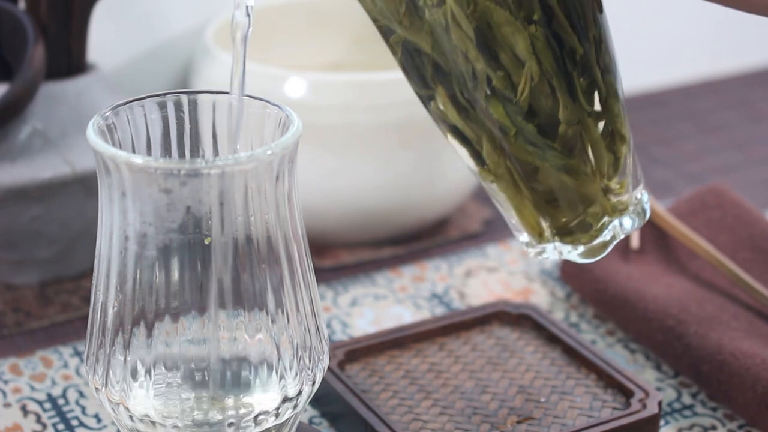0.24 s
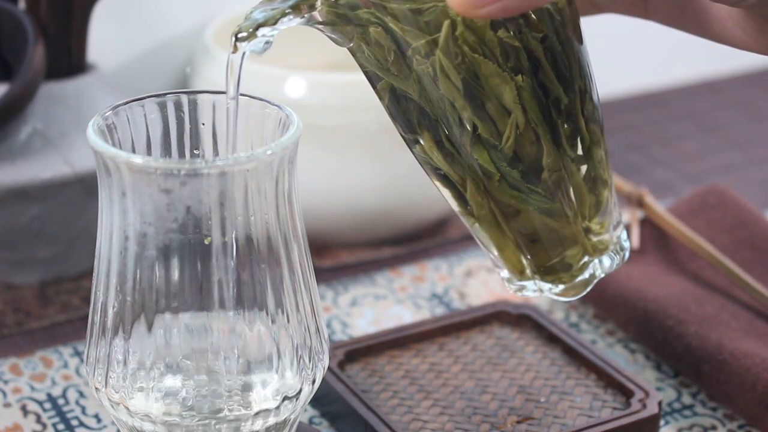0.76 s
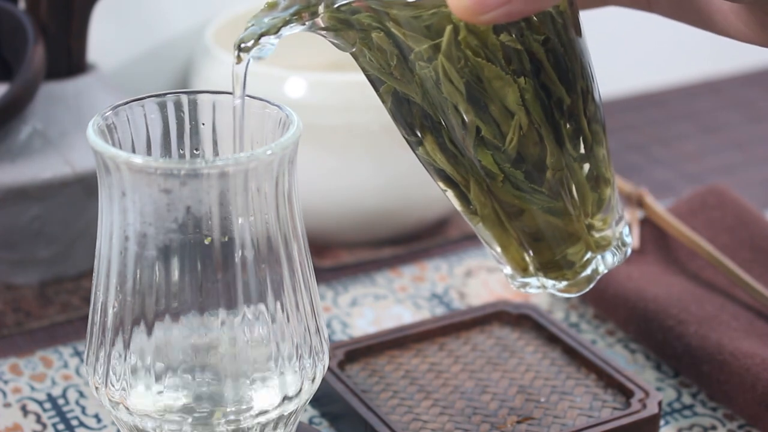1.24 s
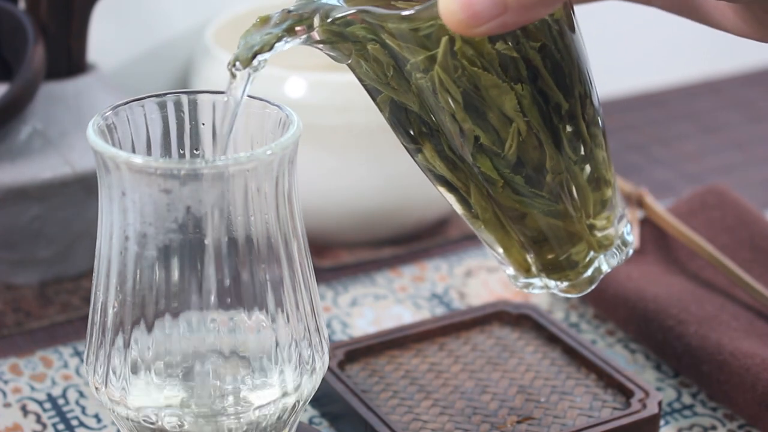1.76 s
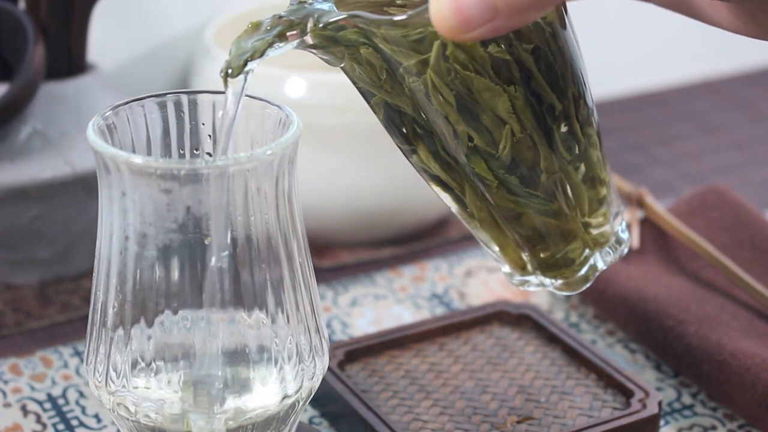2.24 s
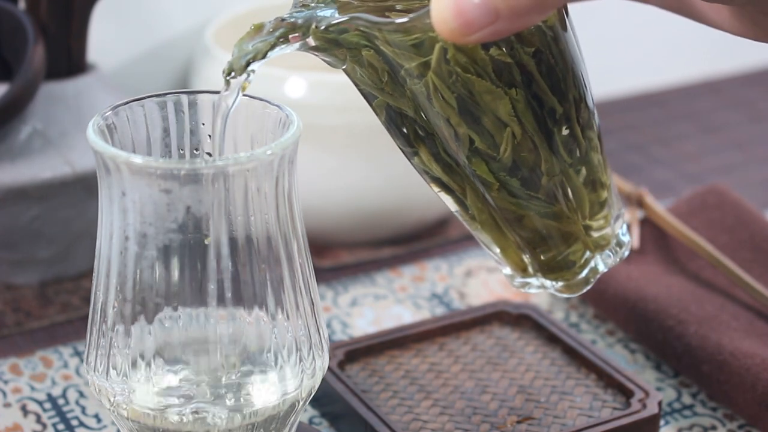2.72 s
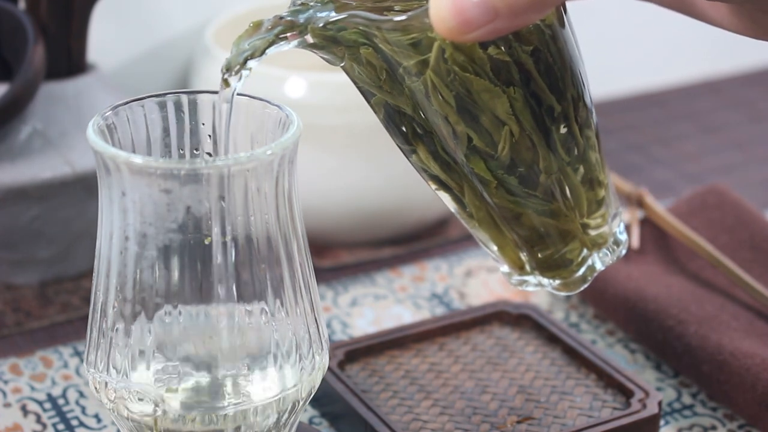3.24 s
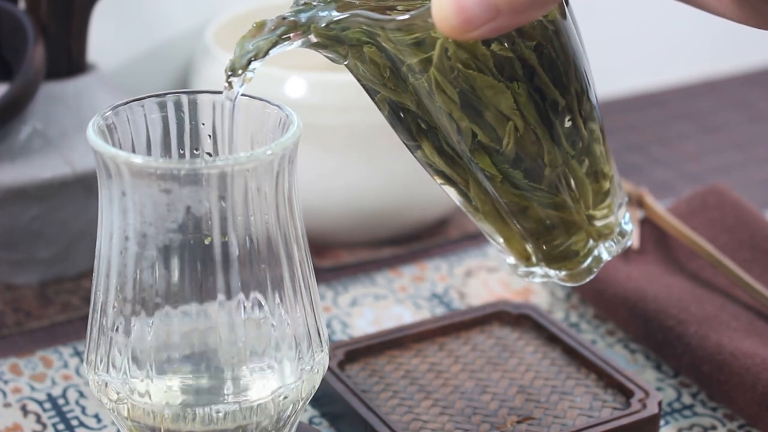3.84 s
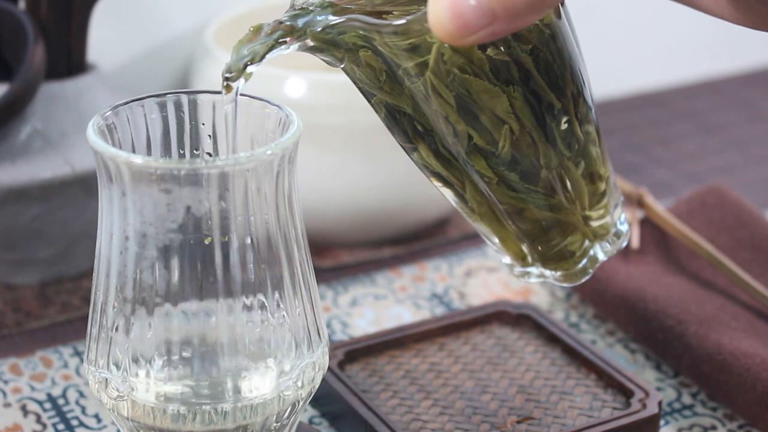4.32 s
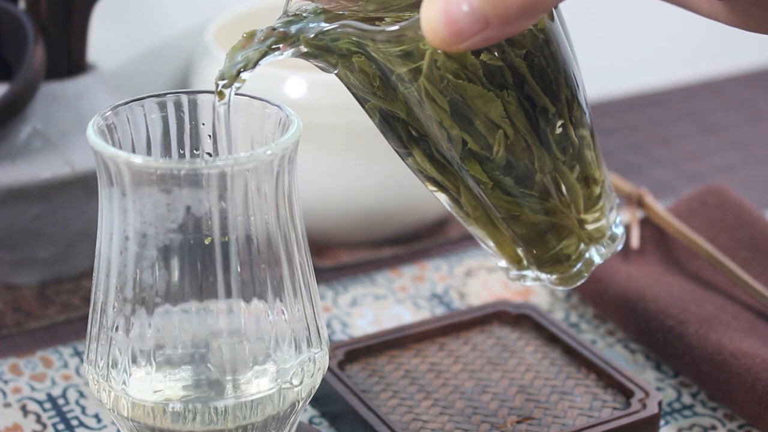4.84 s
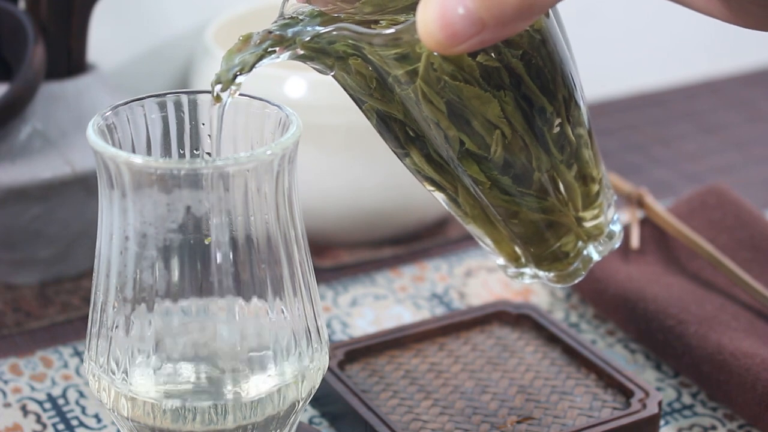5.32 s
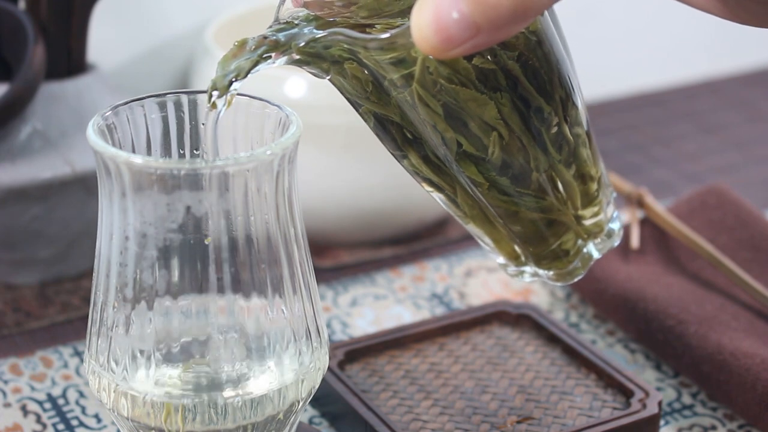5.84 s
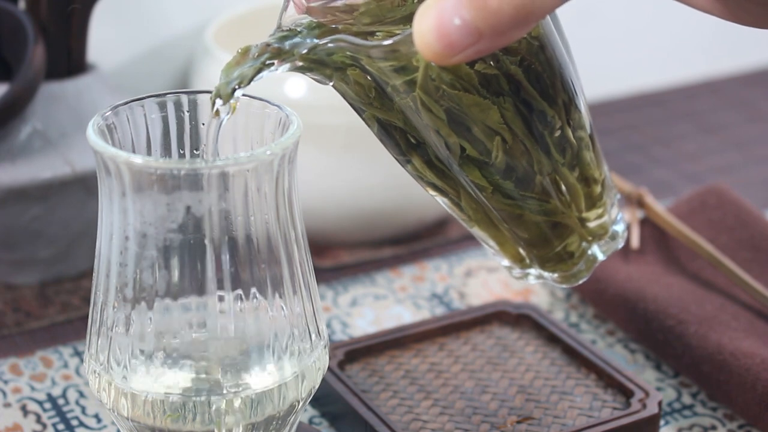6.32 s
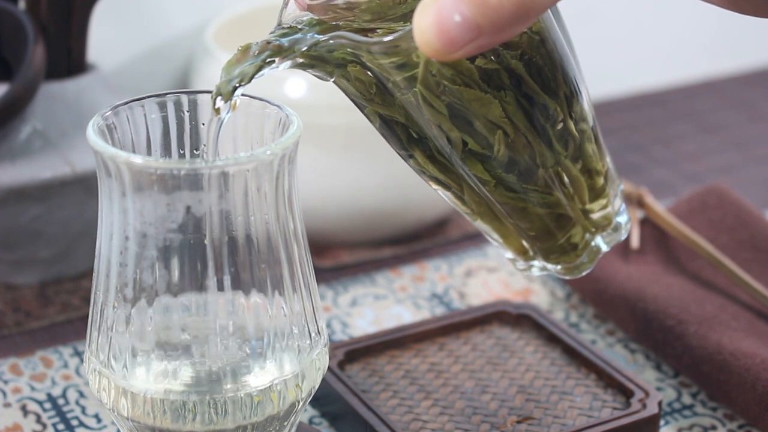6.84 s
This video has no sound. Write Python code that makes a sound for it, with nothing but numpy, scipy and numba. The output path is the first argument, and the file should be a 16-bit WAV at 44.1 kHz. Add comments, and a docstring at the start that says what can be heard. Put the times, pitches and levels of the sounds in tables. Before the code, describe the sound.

In a quiet small room, a low wavering hum and dull rumble lie very faintly underneath. At about 0.07 s a thin stream of tea lands in a tall glass, close to the microphone and slightly left. Through the first 0.7 s, rounded, hollow plinks around 800 Hz crowd together with crisp wet ticks and tiny bright bubbles. From 0.9 to 3 s the plops become shorter and snappier, with strong ones near 1.4, 1.9 and 2.6 s, brief gurgles, and thin high glassy rings at about 1.95, 2.15 and 2.55 s. Soft low table bumps fall near 1.9, 2.5 and 4.5 s. From 3 to 7 s the pour is lighter and sparser, plinks mostly above 1000 Hz, accents near 4.2, 5.3 and 5.8 s. The hollow glass resonance climbs unevenly, while the topmost sparkle softens. Reflections are short, and the pouring continues to the end.

```python
"""In a small room, a thin stream of tea runs from a pitcher into a tall glass close to a stereo microphone.
Drops tick as short noise bursts; trapped air bubbles plink as dying sines, over a random trickle and spray.
Resonant filters for the air above the tea colour them all; their lowest pitch climbs unevenly as it fills.
Three thin glassy tones ring, soft low pings bump the table or thump under a big plink, and a wavering hum lies
over dull rumble."""
import sys
import numpy as np
from scipy import signal
from scipy.fft import rfft, irfft, next_fast_len
from scipy.io import wavfile
from numba import njit

SR = 44100
rng = np.random.default_rng(int(sys.argv[2]) if len(sys.argv) > 2 else 0)


def int16_out(signal):
    """Quantize to a 16-bit WAV file."""
    q = np.round(np.clip(np.atleast_2d(signal).T, -1, 1) * 32767)
    wavfile.write(sys.argv[1], SR, q.astype(np.int16))


N = 311787  # length in samples
TIME = np.arange(N) / SR  # seconds
TOP_HZ = 16400  # highest pitch kept

# loudest plinks, large air bubbles trapped by the stream, before the glass colours them:
# [t/s, level/dB, f/Hz, 60 dB decay time before stretching/s]
BUBBLES = [(0.068, -4.5, 1140, 0.015), (0.0756, -10.5, 879, 0.084), (.1137, -19.5, 883, 0.13),
           (.152, -16.5, 1820, 0.021), (0.1693, -9.5, 891, 0.092), (.182, -10, 857, 0.17),
           (.196, -2.5, 774, 0.072), (.213, -5.5, 722.4, 0.073), (.2417, -4, 801, 0.047),
           (0.279, -16.5, 1750, 0.033), (.2813, -7.5, 765, 0.052), (.3356, -14.5, 810, .035),
           (0.3825, -19.5, 775, 0.11), (.4097, -11, 794, 0.096), (.458, 2.5, 794, 0.05),
           (.4849, -12.5, 880, 0.1), (0.5066, -13, 850, 0.097), (.5467, -2.5, 780, .042),
           (0.5779, -17, 890, 0.055), (.6198, -10.5, 1664, 0.018), (.62, -7, 876, .05),
           (.6553, -3.5, 904, 0.031), (.6912, -6, 940, 0.028), (0.824, -22, 808, .08),
           (0.8603, -8.5, 842, 0.1), (0.9338, -17, 1670, 0.016), (0.9375, -1, 2260, 0.0049),
           (0.9655, -15, 1760, 0.019), (1.0527, 0.5, 1080, 0.017), (1.069, -2.5, 1860, 0.0089),
           (1.0714, 0.5, 970, 0.0059), (1.1585, -11, 842, 0.096), (1.2439, -10, 1130, 0.0071),
           (1.2964, -21, 946, 0.037), (1.3302, -19.5, 970, 0.034), (1.4006, 4.5, 1033, 0.0081),
           (1.4406, -20, 900, 0.023), (1.4848, -17.5, 2200, 0.015), (1.5026, -15, 950, 0.03),
           (1.5428, -11.5, 2000, 0.0089), (1.557, -30, 1620, 0.022), (1.62, 2, 1620, 0.0037),
           (1.6351, -6.5, 940, 0.036), (1.666, -15, 903, 0.073), (1.7026, -6, 1216, .013),
           (1.7668, -16.5, 900, 0.093), (1.7966, -25.5, 854, 0.16), (1.8234, -10.5, 896, 0.075),
           (1.885, 7, 1245, 0.0052), (1.94, -11, 803, 0.041), (2.0024, -1.5, 930, 0.018),
           (2.0283, -17.5, 947, 0.078), (2.091, 3, 1067, 0.012), (2.14, -18, 1060, 0.02),
           (2.2493, 0, 1830, 0.0065), (2.3381, -15.5, 1586, 0.034), (2.3707, -7, 1480, 0.0053),
           (2.5238, -1, 1580, 0.0063), (2.5328, -7.5, 1175, 0.012), (2.5871, -12.5, 1180, 0.03),
           (2.623, 10, 1410, 0.004), (2.6492, -3.5, 880, 0.036), (2.6813, -16.5, 929, 0.068),
           (2.7351, 0.5, 1060, 0.014), (2.7629, -22, 964, 0.052), (2.8529, -14, 1284, 0.017),
           (2.8918, -21.5, 990, 0.052), (2.9292, -12.5, 1840, 0.01), (2.9344, -7.5, 1057, 0.02),
           (3.005, -0.5, 1360, 0.0037), (3.054, -11, 1154, 0.019), (3.0886, -20.5, 1040, 0.022),
           (3.1406, -14, 962, 0.08), (3.2918, -23, 1810, 0.031), (3.3455, -27.5, 1077, 0.025),
           (3.401, -5, 1780, 0.0067), (3.42, -16.5, 1280, 0.015), (3.547, -21, 2261, 0.011),
           (3.5974, -13.5, 1280, 0.011), (3.6569, -11, 1012, 0.034), (3.731, -17, 1194, 0.019),
           (3.8808, -7, 977, 0.044), (3.922, -11, 962, 0.061), (4.0449, -17.5, 1850, .02),
           (4.0577, -19.5, 1252, 0.092), (4.0874, -13, 1205, 0.018), (4.1174, -15, 1140, 0.011),
           (4.1662, -20, 1420, 0.018), (4.2331, 2, 1630, 0.0048), (4.3122, -10.5, 1007, 0.11),
           (4.3958, -3, 1120, 0.032), (4.6052, -10, 1035, 0.11), (4.6439, -21, 1006, 0.044),
           (4.7416, -16, 1130, 0.045), (4.8105, -30, 2030, .022), (4.8375, -10.5, 1744, 0.017),
           (4.8717, -10.5, 1600, 0.0073), (4.9112, -15, 1500, 0.0067), (4.969, -33, 1220, .07),
           (5.0187, -3.5, 1370, 0.0074), (5.0493, -16.5, 1266, 0.023), (5.093, -21, 1340, .015),
           (5.1128, -12, 1440, 0.007), (5.1882, -13.5, 2006, 0.016), (5.288, -19.5, 1137, 0.083),
           (5.3343, 0, 1206, 0.016), (5.4898, -2.5, 1340, 0.0097), (5.6969, -12, 2050, 0.016),
           (5.752, -13.5, 2180, 0.013), (5.7999, 0.5, 1250, 0.0078), (5.874, -7, 1130, 0.037),
           (6.0261, -10.5, 1322, 0.012), (6.1013, -21, 1760, 0.013), (6.1261, -12, 1680, 0.022),
           (6.2012, -23.5, 1166, 0.044), (6.2363, -9.5, 1540, 0.0049), (6.3525, -20, 1780, 0.017),
           (6.4737, -14.5, 1030, 0.03), (6.5051, -6, 1077, 0.028), (6.517, -13, 1030, 0.052),
           (6.7077, -12, 2010, 0.019), (6.8046, -13, 1650, 0.013), (6.8663, -17.5, 1209, 0.059),
           (6.9054, -11.5, 1123, 0.061), (7.0267, -14, 1570, 0.0055)]
# broad colour of a sound as it leaves the mouth of the glass: [f/Hz, level/dB]
MOUTH = [(300, -21.5), (950, 20), (1800, 18.5), (2650, 9.5), (3450, 23.5), (4100, 15.5), (5000, 4.5),
         (5850, 22), (7100, 15.5), (8700, 11.5), (9800, -6), (10800, 2), (13000, -1.5), (16000, -22.5)]


def amp(db):
    """Turn decibels into a gain."""
    return 10 ** (np.asarray(db) / 20)


def unit(x):
    """Scale a sound to an rms (average strength) of 1."""
    return x / np.sqrt(np.mean(x ** 2))


def add(out, s, sound):
    """Mix a sound into a track at time s, in seconds."""
    i = int(np.clip(s * SR, 0, N - 1))
    out[i:i + len(sound)] += sound[:N - i]


def fade(t, t60):
    """Die away exponentially, by 60 dB in t60 seconds."""
    return np.exp(-np.log(1000) * t / t60)


def gain_at(hz, points):
    """Read the gain of a (Hz, dB) curve at the given frequencies, on a logarithmic pitch scale."""
    f, db = np.transpose(points)
    return amp(np.interp(np.log(np.maximum(hz, 1)), np.log(f), db))


def colour(x, points, size=1024):
    """Filter by a (Hz, dB) curve, with an echo-free response that starts at once (minimum phase)."""
    cepstrum = irfft(np.log(gain_at(np.fft.rfftfreq(size, 1 / SR), points)))
    # fold the second half onto the first, so that nothing sounds ahead of its cause
    cepstrum[1:size // 2] *= 2
    cepstrum[size // 2 + 1:] = 0
    response = irfft(np.exp(rfft(cepstrum)))
    return signal.fftconvolve(x, response)[:len(x)]


def cut(x, hz, kind, order=2):
    """Keep only the sound above ("high") or below ("low") a frequency."""
    return signal.sosfilt(signal.butter(order, hz, kind, fs=SR, output="sos"), x)


@njit
def resonate(x, hz, width):
    """Band-pass (gain 1 at the centre) and high-pass outputs of a resonance with a moving centre."""
    y = np.empty((2, len(x)))
    band, low = 0., 0.  # the filter's two memories
    for i in range(len(x)):
        g = np.tan(np.pi * hz[i] / SR)
        k = width / hz[i]
        v = (band + g * (x[i] + 1e-18 - low)) / (1 + g * (g + k))
        y[0, i] = k * v
        y[1, i] = x[i] - k * v - low - g * v
        band, low = 2 * v - band, low + 2 * g * v
    return y


def ping(db, hz, t60, rise=0, attack=.0001):
    """A dying sine whose pitch climbs by the share `rise` each second, as a bubble's does near the surface."""
    t = np.arange(int(t60 * SR) + 2) / SR
    phase = 2 * np.pi * hz * (t + rise * t * t / 2)
    return amp(db) * (1 - np.exp(-t / attack)) * fade(t, t60) * np.sin(phase)


def background(rumble_db=-65, waver=0.74, waver_hz=6, apart_db=-7):
    """A low hum of steady pitches wavers in level, over a dull rumble that differs between the sides."""
    # hum before wavering: [f/Hz, rms level/dB]
    hum_tones = [(55, -70), (317.6, -87.5), (436, -81)]
    # room rumble, whose overall level is set apart: [f/Hz, relative level/dB]
    rumble_colour = [(20, -31), (40, -22), (58, -9), (80, -26.5), (115, -41), (200, -43), (420, -38.5),
                     (1000, -47), (7000, -62), (14000, -84.5)]
    noise = rng.standard_normal((3, N))
    spectra = rfft(noise[:2]) * gain_at(np.fft.rfftfreq(N, 1 / SR), rumble_colour)
    mid, side = (unit(v) for v in irfft(spectra, N))
    hum = sum(amp(db) * unit(np.sin(2 * np.pi * hz * TIME)) for hz, db in hum_tones)
    hum = hum * (1 + waver * unit(cut(noise[2], waver_hz, "low")))
    return hum + amp(rumble_db) * (mid + amp(apart_db) * side * np.array([[1], [-1]]))


def column_hz(s):
    """Lowest resonance of the air in the glass at time s: a shorter air column sounds higher."""
    # lowest resonance of the air above the tea: [t/s, f/Hz]
    column = [(0, 799), (.45, 876), (.7, 906.5), (1.4, 1016), (2.7, 925), (3.2, 1062), (4.4, 953),
              (6.2, 1043), (7.07, 1058)]
    return np.interp(s, *np.transpose(column))


def all_drops(tick_db=-25, plink_tilt_db=-1, bead_db=-27, bead_hz=3480,
              faint_db=-36, range_db=10, faint_tilt_db=16, faint_bead_db=-25,
              low_hz=3200, high_hz=10000, count=90):
    """List the loud drops, a dull one that starts each plink, and faint ones at random times."""
    # loudest drops, each leaving a tiny bubble, before later gains; brightness tilt is the
    # boost at 11 kHz and equal cut at 3 kHz:
    # [t/s, tick level/dB, brightness tilt/dB, bubble level/dB, bubble f/Hz]
    loud = [(.0678, -21.5, 5, -5.5, 6450), (.145, -36, -20, -18.5, 3100), (.1546, -25, -1, -12.5, 5660),
            (.171, -20, 5, -16.5, 11300), (.1956, -9.5, -2.5, -27, 3530), (.2357, -15.5, 2, -13, 8400),
            (.28, -17, 4.5, -14, 14100), (0.326, -32, 6, -27, 11500), (0.3686, -53, -5, -32, 3320),
            (.4076, -25.5, -14, -17, 10900), (.451, -5, -4, -45, 3320), (.483, -23, 6, -36.5, 3445),
            (.507, -22.5, -7, -15.5, 5900), (.5498, -50, -3, -12, 3960), (.6917, -15, 5, -40, 3740),
            (.7283, -23, 6, -12.5, 12100), (.8608, -11.5, 3, -14.5, 4170), (.8865, -14.5, 4.5, -21.5, 3280),
            (.9406, -44, 12, -14.5, 3000), (.9661, -36, -21, -7, 3240), (1.0194, -12.5, 10, -7, 8000),
            (1.0532, -14, 1.5, -26, 3340), (1.0703, -19, 6, -20, 3200), (1.2538, -29.5, 10, -37, 3340),
            (1.379, -31.5, -15.5, -44, 3200), (1.548, -27.5, 10, -29, 4350), (1.5587, -18, -7, -10.5, 3560),
            (1.5967, -43, -26, -9.5, 3240), (1.6207, -26.5, -18.5, -28, 3650),
            (1.7057, -26.5, -14, -22, 4080), (1.821, -23.5, 4, -21, 14800), (1.8834, -11, 8.5, -41, 9030),
            (1.896, -48, 4, -12.5, 3280), (1.9476, -24.5, -1.5, -22.5, 4130),
            (2.0097, -19, -3, -15.5, 3900), (2.0423, -6.5, -2, -12.5, 2840), (2.0675, -13, 0, -28, 6100),
            (2.1713, -34, 26.5, -23, 4620), (2.197, -15.5, 0.5, -25, 4430), (2.2398, -19.5, 10, -9.5, 6170),
            (2.2665, -18, -1, -31, 3500), (2.2861, -29, 12, -19, 15000), (2.3374, -14.5, -1.5, -17, 14200),
            (2.4049, -23.5, 23, -11, 10000), (2.433, -36, 35, -9.5, 11200), (2.559, -15, -4.5, -47, 3630),
            (2.6235, -19.5, 2.5, -38, 3445), (2.8768, -28, 23.5, -11, 6230), (2.9307, -25, 15, -18, 3500),
            (2.956, -36, 27, -24, 8950), (3.005, -25.5, -3, -32, 3300), (3.0324, -24, 18, -50, 8300),
            (3.1099, -45, 31, -19, 10600), (3.1289, -27.5, 18, -16.5, 8300),
            (3.2049, -18.5, 4.5, -27, 9250), (3.2486, -19.5, 4.5, -27, 3480),
            (3.4044, -29, -15.5, -19, 3520), (3.423, -19, -7, -18, 3260), (3.5051, -26, 15, -34, 8840),
            (3.549, -20, -4.5, -14.5, 5940), (3.791, -16, 2.5, -14, 4150), (3.8493, -30, 11.5, -11, 5900),
            (3.987, -26.5, -0.5, -31, 3600), (4.0456, -26, 13, -30, 8440), (4.0884, -21, -1.5, -17.5, 3470),
            (4.1175, -18, 3.5, -18.5, 4650), (4.1667, -21.5, 0, -16.5, 3460), (4.247, -20, -0.5, -26, 3420),
            (4.3699, -58, -3, -23.5, 3580), (4.3926, -27, -4, -25, 3630), (4.456, -41, -12, -25.5, 3450),
            (4.555, -21, 22, -18.5, 3440), (4.6117, -19.5, 2, -13.5, 3790), (4.7137, -38, 7, -24, 3500),
            (4.8353, -26, -10.5, -37, 3800), (4.9004, -49, 36.5, -38, 3450), (5.1187, -39, 29.5, -18, 8630),
            (5.151, -19.5, 4, -14.5, 3370), (5.19, -22, 3, -23.5, 10700), (5.2198, -37, 22, -28, 4040),
            (5.2642, -18.5, 18, -1.5, 7000), (5.3346, -9, 1, -14, 3630), (5.489, -40.5, 24, -31, 3490),
            (5.5538, -23, -1, -11.5, 3770), (5.563, -16, 10.5, -14, 5170), (5.6192, -15, 0, -14, 4100),
            (5.696, -21.5, -4, -20.5, 3430), (5.7352, -20, 7, -20, 3660), (5.7506, -24, 13, -21, 3400),
            (5.772, -38, 21, -33, 9900), (5.9529, -40.5, 33, -21, 14500), (5.9637, -19, 3.5, -13, 3550),
            (6.1244, -10, 1, -8, 3530), (6.1836, -31.5, -7.5, -14, 8580), (6.23, -24.5, -1, -27, 8530),
            (6.2967, -45, 43, -15, 11050), (6.3712, -35, 22, -15.5, 8800), (6.399, -33, -4, -33, 10800),
            (6.5047, -28, 18, -24.5, 4230), (6.6045, -28, 8, -13.5, 6070), (6.628, -40, 10, -20, 3250),
            (6.708, -53, -16, -11.5, 3116), (6.791, -26.5, -4.5, -38, 3650), (6.818, -25, -6.5, -34, 3400),
            (6.94, -16.5, -6, -14.5, 3770)]
    plinks = [(s, tick_db + db, plink_tilt_db, bead_db + db, bead_hz) for s, db, _, _ in BUBBLES]
    start = BUBBLES[0][0]
    faint = []
    for k, (when, luck, small) in enumerate(rng.random((count, 3))):
        s = start + (k + when) / count * (N / SR - start)  # one in each equal slice of time
        quieter_db = range_db * luck
        hz = low_hz * (high_hz / low_hz) ** (small * small)
        faint.append((s, faint_db - quieter_db, faint_tilt_db * small, faint_bead_db - quieter_db, hz))
    return list(loud) + plinks + faint


def drops(falls, crack_db=-15, crack_t60=0.0035, splatter_db=-22, splatter_t60=0.0082, attack=0.00024,
          top_tilt=1.14, air_db=5, dulling_db_per_s=6.0, size=1400):
    """Each drop is a noise crack and splatter, dull or bright; as the fall shortens, the very top fades."""
    out, t = np.zeros(N), np.arange(size) / SR
    shape = amp(crack_db) * fade(t, crack_t60) + amp(splatter_db) * fade(t, splatter_t60)
    shape = shape * (1 - np.exp(-t / attack))
    for (s, db, tilt, _, _), grit in zip(falls, rng.standard_normal((len(falls), size))):
        top_db = top_tilt * tilt + air_db - dulling_db_per_s * s
        slope = [(3000, -tilt), (11000, tilt), (13500, top_db)]
        add(out, s, amp(db) * colour(grit * shape, slope, size=128))
    return colour(out, MOUTH)


def beads(falls, level_db=-1, cycles=40, rise=14, small_db=-13, small_cycles=22, scatter=0.13,
          late_s=0.017, count=4):
    """Each drop leaves one tiny ringing bubble, then a few fainter ones of about its size."""
    out = np.zeros(N)
    for (s, _, _, db, hz), chances in zip(falls, rng.random((len(falls), count, 3))):
        add(out, s, ping(db + level_db, hz, cycles / hz, rise, attack=0.00047))
        for when, place, luck in chances:
            pitch = min(hz * np.exp(scatter * (2 * place - 1)), TOP_HZ)
            small = ping(db + small_db - 10 * luck, pitch, small_cycles / pitch, rise, attack=0.00021)
            add(out, s + late_s * when, small)
    return out


def bubbles(stretch=0.81, climb=0.14, climb_power=1.86, echo_db=-17, follow=0.27, late_s=0.05,
            smaller=0.069, spread=0.32, small_t60=0.013, count=2):
    """Each large bubble plinks, climbing more if pitched above the air column, then sheds fainter ones."""
    out = np.zeros(N)
    for (s, db, hz, t60), chances in zip(BUBBLES, rng.random((len(BUBBLES), count, 3))):
        rise = climb * (hz / column_hz(s)) ** climb_power / t60  # share of the pitch per second
        add(out, s, ping(db, hz, t60 * stretch, rise, attack=0.00062))
        for when, size, luck in chances:
            pitch = hz * np.exp(spread * (size - .5) + smaller)
            shed = ping(follow * db + echo_db - 10 * luck, pitch, small_t60, 9 * luck, attack=0.0055)
            add(out, s + late_s * when, shed)
    return out


def flow(trickle_or_spray):
    """Gain over time of the trickle (0) or spray (1); silent until the stream lands."""
    # level of the pour between the loud drops, before each layer's own gain:
    # [t/s, trickle level/dB, spray level/dB]
    pour_levels = [(0.07, -71, -78), (0.26, -54, -70), (0.54, -37, -48), (0.91, -68, -75), (1.24, -43, -64),
                   (2.0, -45.5, -68), (2.31, -78, -60.5), (2.56, -62, -64), (2.74, -51, -81),
                   (3.03, -37.5, -68.5), (3.34, -60, -51), (3.74, -61, -71), (4.26, -47, -69),
                   (4.4, -65.5, -64), (6.09, -55.5, -68.5), (6.48, -59, -63), (6.83, -49, -55.5),
                   (7.07, -50, -51)]
    s, *levels = np.transpose(pour_levels)
    return amp(np.interp(TIME, s, levels[trickle_or_spray])) * (TIME > s[0])


def trickle(level_db=-1, lowest=0.932, highest=2.466, tilt_db=-9, spread_db=9, cycles=40, rise=14, count=620):
    """Faint chirping bubbles at random, strongest toward the low end, near the air column's pitch."""
    out = np.zeros(N)
    for when, place, luck, climb in rng.random((count, 4)):
        s = when * N / SR
        ratio = lowest * (highest / lowest) ** place  # pitch relative to the air column
        hz = column_hz(s) * ratio
        db = tilt_db * np.log2(ratio) - spread_db * luck
        add(out, s, ping(db, hz, cycles / hz, rise * climb * place, attack=0.003))
    return unit(out) * flow(0) * amp(level_db)


def spray(level_db=5, low_hz=1400, high_hz=14000, spread_db=10.5, cycles=34, rise=28, tilt_db=3, count=2200):
    """Many small random bubbles, mostly faint, as the stream breaks up; each swells over two cycles."""
    out = np.zeros(N)
    for when, place, luck in rng.random((count, 3)):
        hz = low_hz * (high_hz / low_hz) ** place
        size_db = -spread_db * np.log(max(luck, 1 / 20)) + tilt_db * np.log2(hz / low_hz)
        add(out, when * N / SR, ping(size_db, hz, cycles / hz, rise, attack=2 / hz))
    return unit(colour(out, MOUTH)) * flow(1) * amp(level_db)


def glass(splash, column_db=2, width_hz=30, mouth_hz=660, half_full_hz=950, steepness=1.72,
          knee_hz=800, wall_db=-29):
    """Air in the glass rings after each splash; the mouth radiates little bass, a trace passes the wall."""
    # sharper resonances across the glass, which stay put as it fills: [f/Hz, width/Hz, level/dB]
    upper_air = [(3405, 260, -11), (3840, 35, 4.5), (8860, 270, 8), (10690, 90, 11.5)]
    # faint fixed resonances, perhaps of the other tea things: [f/Hz, width/Hz, level/dB]
    surroundings = [(946, 14, -8), (1014, 12, -4), (1227, 20, -8), (1402, 20, -10), (1650, 20, -4),
                    (1760, 24, -6), (3162, 40, -6), (4300, 60, -3)]
    # bands between the air's resonances, some cut and some slightly raised: [f/Hz, width/Hz, gain/dB]
    gaps = [(2747, 144, -19), (4540, 1600, 2.5), (7180, 760, -0.5), (8900, 600, 2)]
    hz = column_hz(TIME)
    sound = splash + amp(column_db) * resonate(splash, hz, float(width_hz))[0]
    for mode_hz, width, db in list(upper_air) + list(surroundings):
        sound = sound + amp(db) * resonate(splash, np.full(N, float(mode_hz)), float(width))[0]
    for gap_hz, width, db in gaps:
        sound = sound - (1 - amp(db)) * resonate(sound, np.full(N, float(gap_hz)), float(width))[0]
    # the bass cut moves with the air column's pitch
    for _ in range(2):
        sound = resonate(sound, mouth_hz * (hz / half_full_hz) ** steepness, float(knee_hz))[1]
    through_wall = amp(wall_db) * cut(splash, 200, "high") * (half_full_hz / hz) ** 4
    return sound + through_wall


def room(x, near_db=-9, near_t60=0.038, tail_db=-8, low_t60=0.24, high_t60=0.17, split_hz=2500, size=14000):
    """Quick reflections from the tea things, then a short tail; the sides differ most in the treble."""
    t = np.arange(size) / SR
    shared, left, right = rng.standard_normal((3, size))
    tails = []
    for own in (left, right):
        bass = cut(shared + .4 * own, split_hz, "low")
        treble = cut(own - shared, split_hz, "high") / np.sqrt(2)
        parts = ((bass + treble, near_db, near_t60), (bass, tail_db, low_t60), (treble, tail_db, high_t60))
        echo = 0
        for noise, db, t60 in parts:
            shape = fade(t, t60) * (t > .001)
            echo = echo + amp(db) * noise * shape / np.linalg.norm(shape)
        tails.append(signal.fftconvolve(x, echo)[:N])
    return np.array(tails)


def sooner(x, ms):
    """Advance a track by a fraction of a millisecond, by turning the phase of each frequency."""
    size = next_fast_len(N + 64)
    turn = np.exp(2j * np.pi * np.fft.rfftfreq(size, 1000 / SR) * ms)
    return irfft(rfft(x, size) * turn, size)[:N]


def gurgles(sweep_ratio=1.37, wobble=0.54, wobble_hz=90):
    """A bubble that reaches the surface swells and fades, wobbling, while its pitch sweeps up."""
    # rising bubbles, before wobble and glass: [t/s, level/dB, start f/Hz, length/s]
    sweeps = [(0.376, -36, 1242, 0.055), (0.568, -31, 972, 0.034), (0.667, -20, 926, 0.027),
              (0.879, -21.5, 898, 0.036), (1.178, -20.5, 857, 0.018), (1.422, -30.5, 1170, 0.03),
              (1.593, -30.5, 1540, 0.018), (1.504, -34, 1370, .026), (1.684, -40.5, 1447, .022),
              (1.818, -29.5, 1870, 0.0172), (2.017, -25.5, 1056, 0.051), (2.046, -34, 1180, 0.02),
              (2.101, -29, 1020, 0.06), (3.059, -44, 1113, 0.0646), (3.203, -33, 1434, 0.015),
              (5.02, -31, 1740, 0.0142), (5.801, -18, 1630, 0.0078), (6.515, -17.5, 1081, 0.021)]
    out = np.zeros(N)
    for s, db, hz, length in sweeps:
        part = np.linspace(0, 1, int(length * SR) + 2)
        phase = 2 * np.pi * np.cumsum(hz * sweep_ratio ** part) / SR
        swell = np.sin(np.pi * np.sqrt(part))
        add(out, s, amp(db) * swell * np.sin(phase))
    return out * (1 + wobble * unit(cut(rng.standard_normal(N), wobble_hz, "low")))


def bumps():
    """Soft low thumps ring as dying sines: blows on the table, and one under a big plink."""
    # low thumps: bumps on the table, and first the thump under the big plink at 1.885 s: [t/s, level before
    # attack/dB, f/Hz, 60 dB decay time/s]
    blows = [(1.884, -34.5, 227, 0.024), (2.512, -43, 58.4, 0.68), (4.478, -37, 154, 0.12),
             (4.504, -37.5, 100, 0.19), (4.519, -35.5, 150, 0.14), (4.545, -37.5, 60, 0.23)]
    out = np.zeros(N)
    for s, db, hz, t60 in blows:
        add(out, s, ping(db, hz, t60, attack=0.0031))
    return out


def rings(ring_hz=4682, flutter=0.51, flutter_hz=40):
    """A thin glassy tone swells quickly and dies away, fluttering."""
    # glassy tones: [t/s, level before attack and flutter/dB, 60 dB decay time/s]
    tones = [(1.948, -53, .8), (2.159, -43, 1.2), (2.554, -42, 0.36)]
    out = np.zeros(N)
    for s, db, t60 in tones:
        add(out, s, ping(db, ring_hz, t60, attack=0.011))
    return out * (1 + flutter * unit(cut(rng.standard_normal(N), flutter_hz, "low")))


def scene(left_lead_ms=0.079):
    """The glass stands a little to the left, so the left side hears it sooner and mostly louder."""
    # left level minus right level, shared half and half: [f/Hz, difference/dB]
    sides = [(60, 5), (380, 1.5), (700, 1.2), (2380, 2), (4400, 4), (8120, 2.5), (11000, -1), (15000, 1)]
    falls = all_drops()
    splash = bubbles() + gurgles() + trickle() + drops(falls) + beads(falls) + spray()
    pour = glass(splash)
    left, right = pour + room(pour) + bumps() + background()
    left = colour(sooner(left, left_lead_ms), [(hz, db / 2) for hz, db in sides])
    right = colour(right, [(hz, -db / 2) for hz, db in sides])
    return np.array([left, right]) + rings()


def record(dry):
    """The recorder clips at full scale, then steeply cuts the top."""
    top_cut = signal.ellip(8, .2, 70, TOP_HZ, fs=SR, output="sos")
    return signal.sosfilt(top_cut, np.clip(dry, -1, 1))


dry = scene()
out = record(dry)
int16_out(out)
```